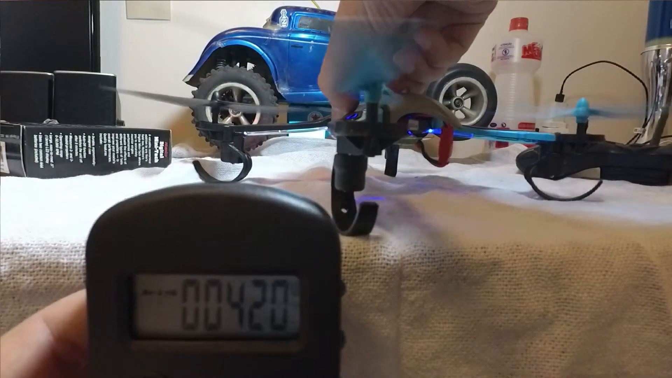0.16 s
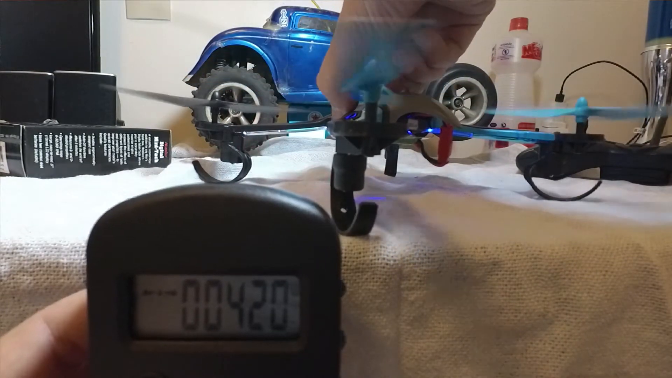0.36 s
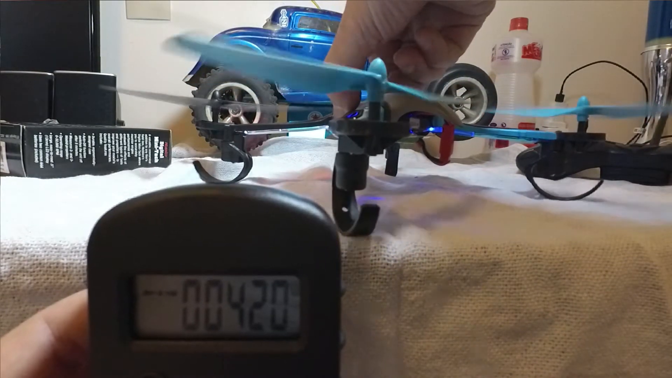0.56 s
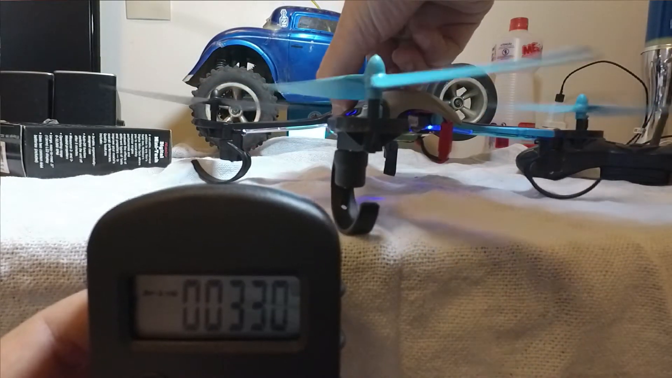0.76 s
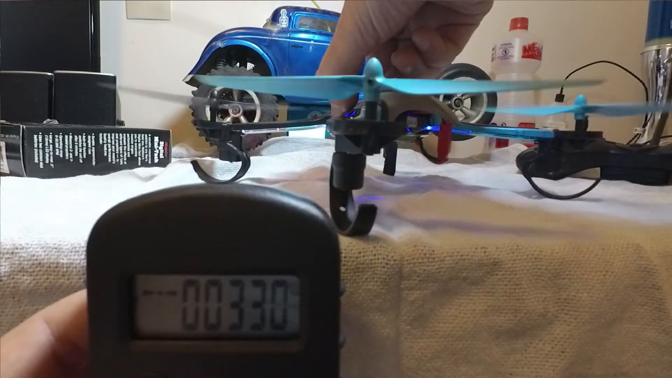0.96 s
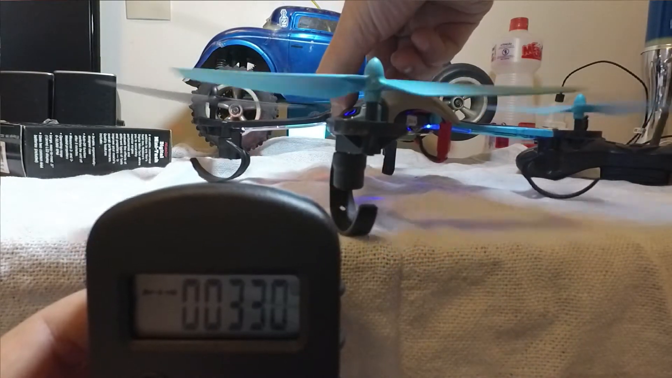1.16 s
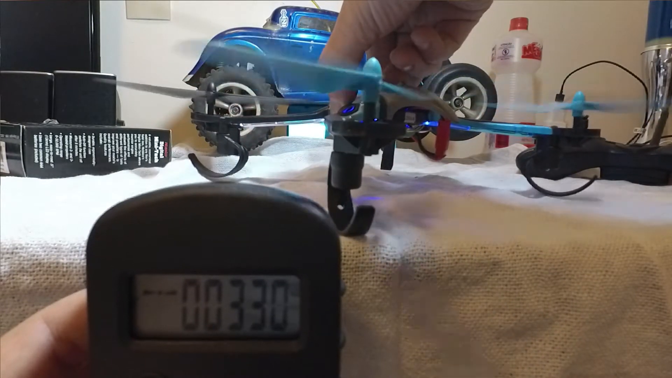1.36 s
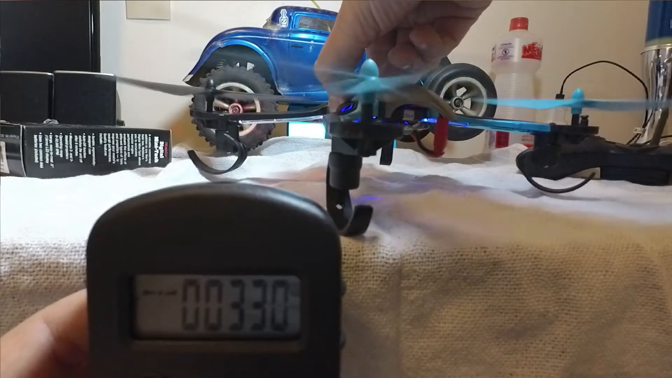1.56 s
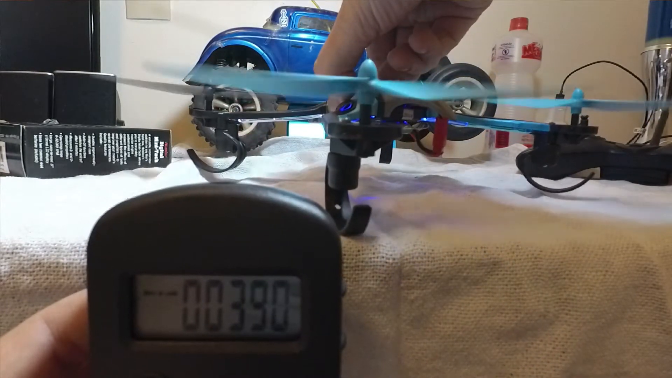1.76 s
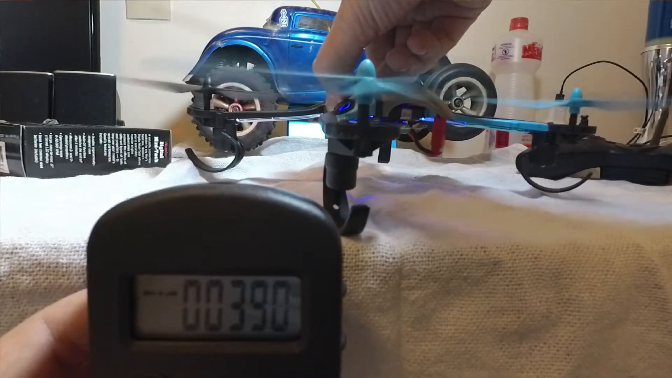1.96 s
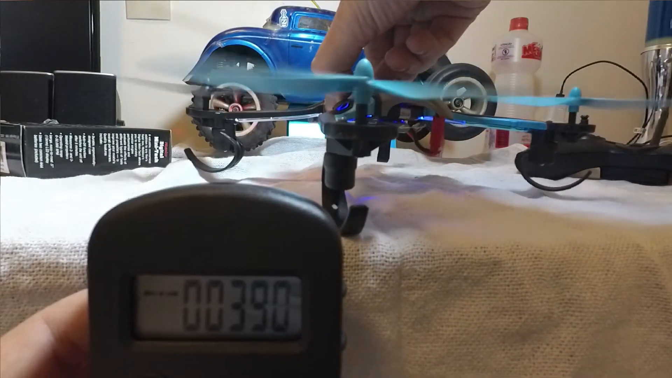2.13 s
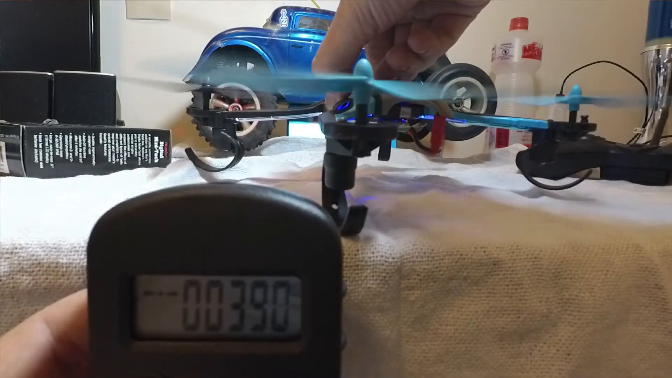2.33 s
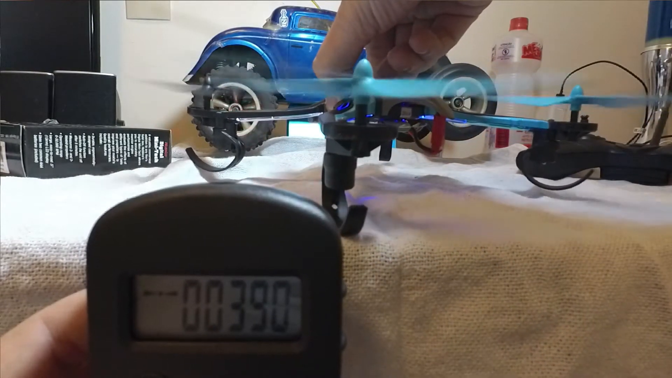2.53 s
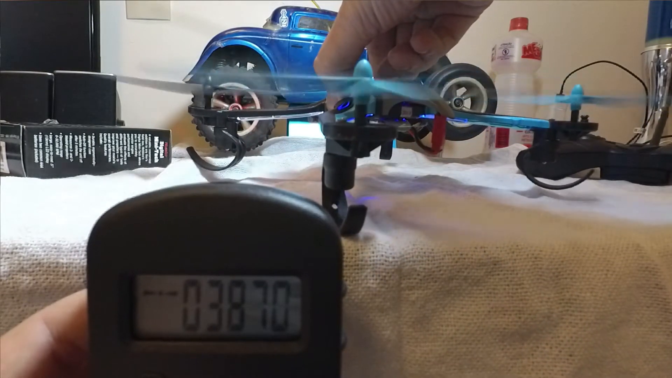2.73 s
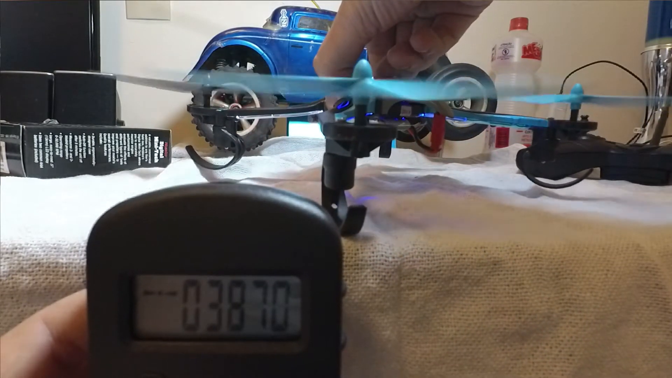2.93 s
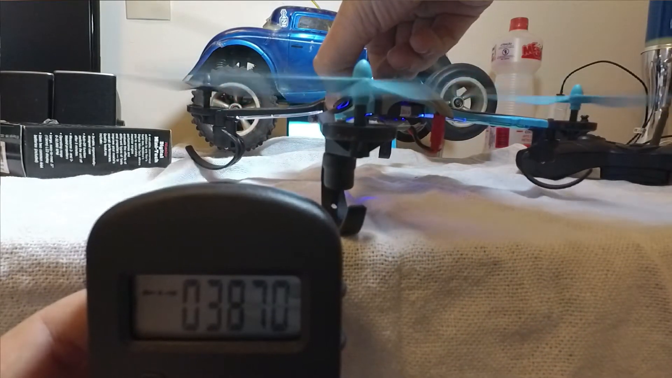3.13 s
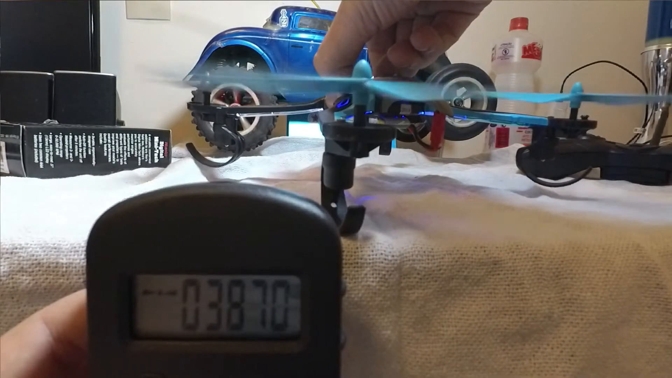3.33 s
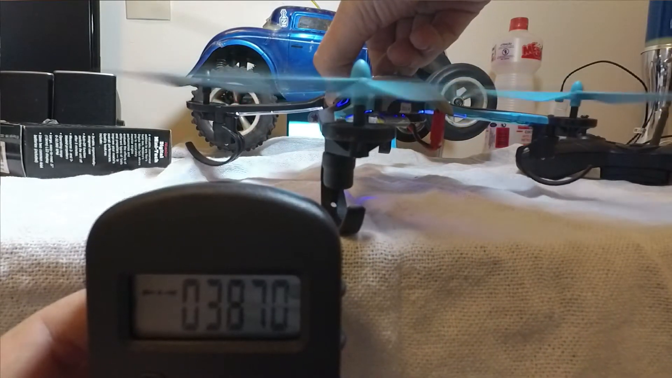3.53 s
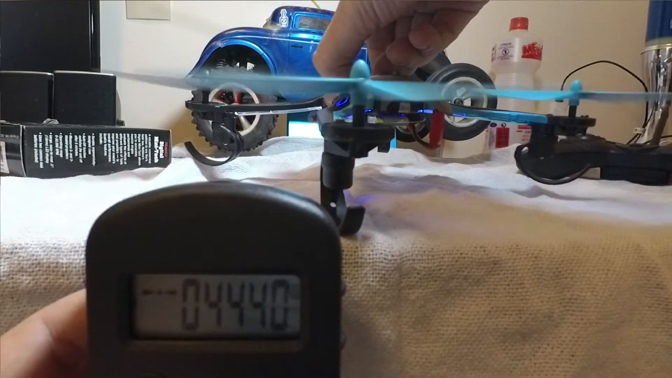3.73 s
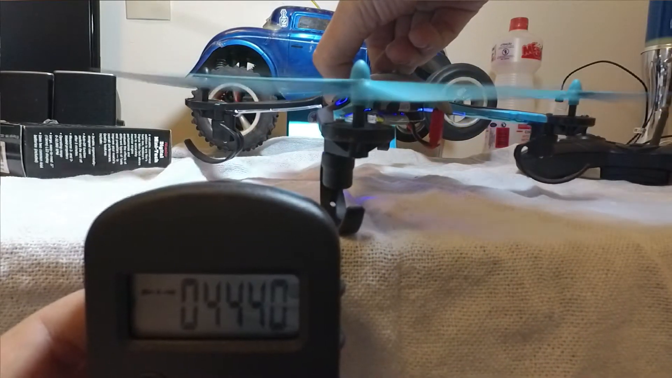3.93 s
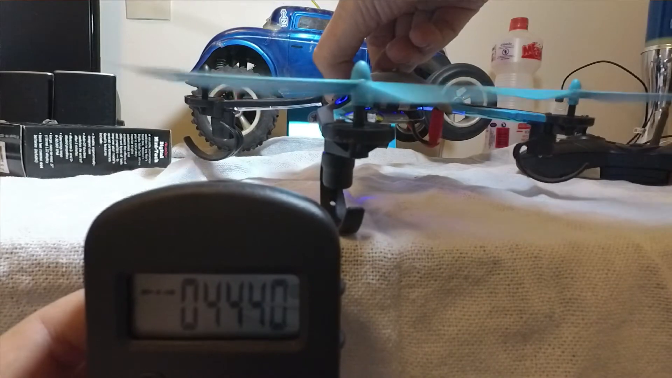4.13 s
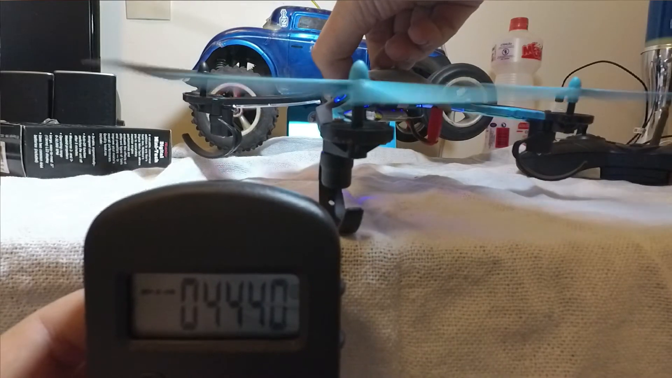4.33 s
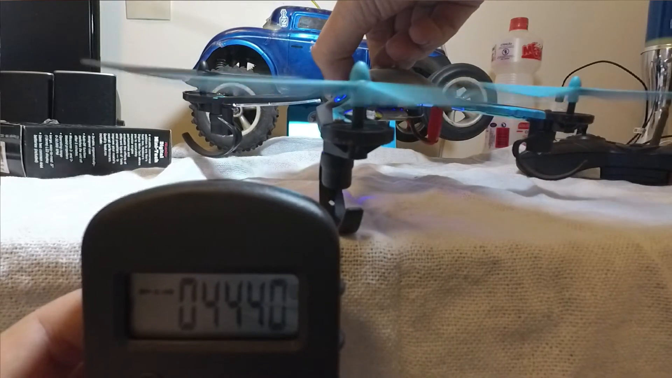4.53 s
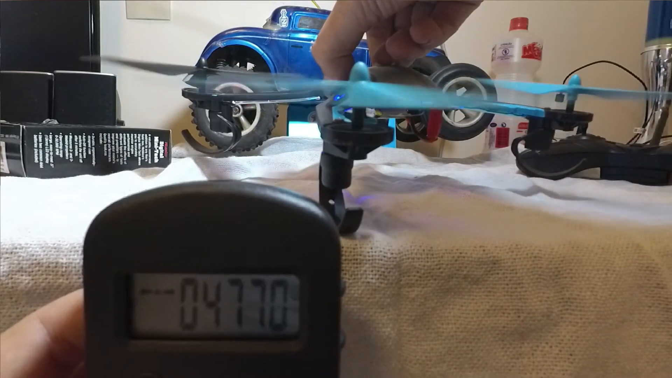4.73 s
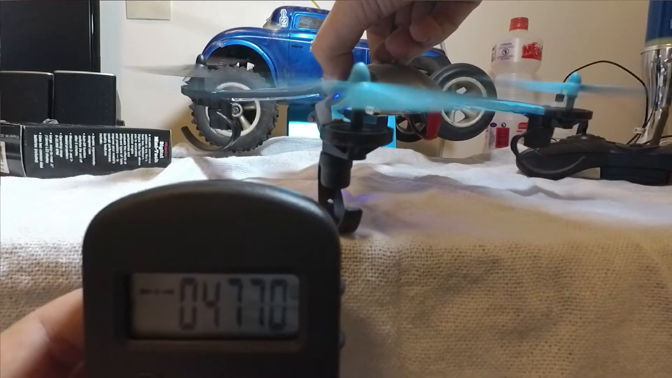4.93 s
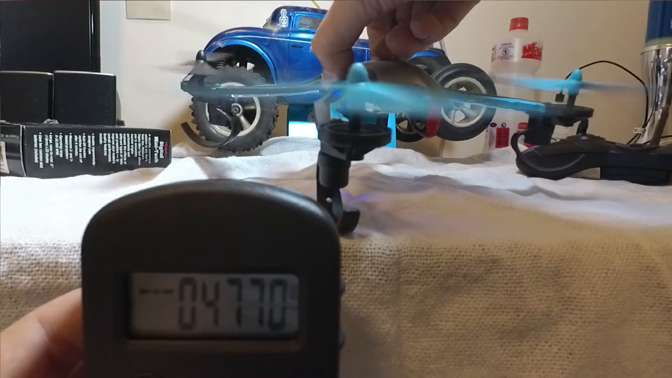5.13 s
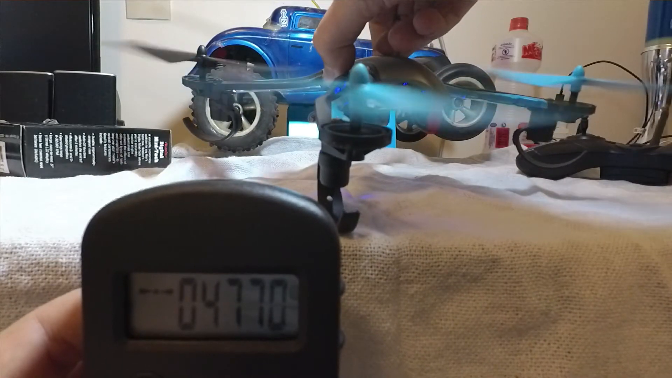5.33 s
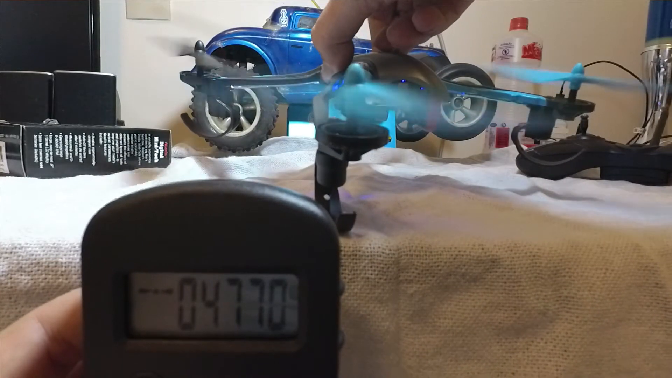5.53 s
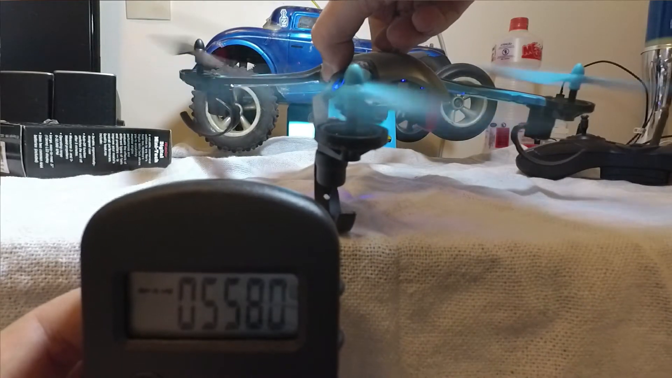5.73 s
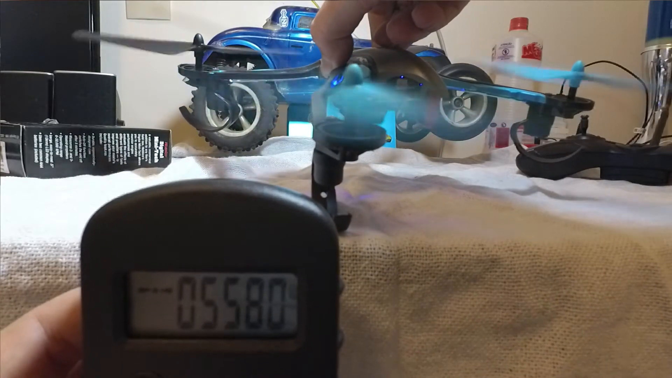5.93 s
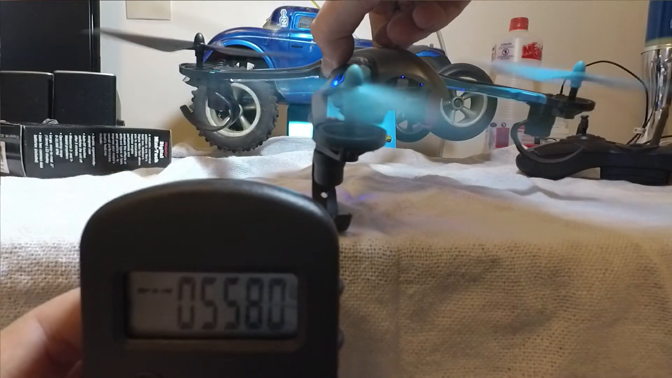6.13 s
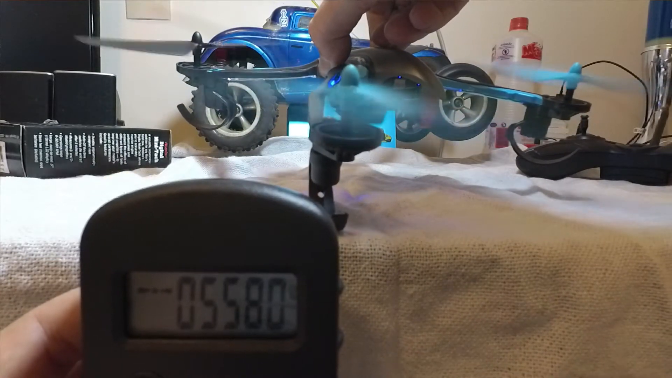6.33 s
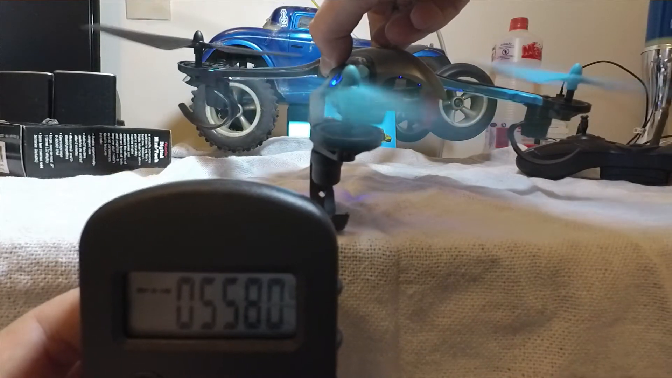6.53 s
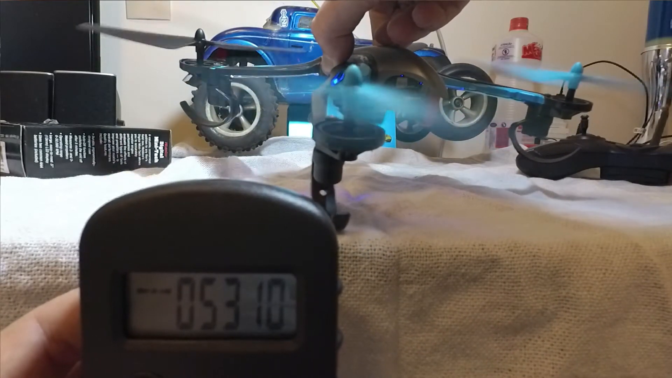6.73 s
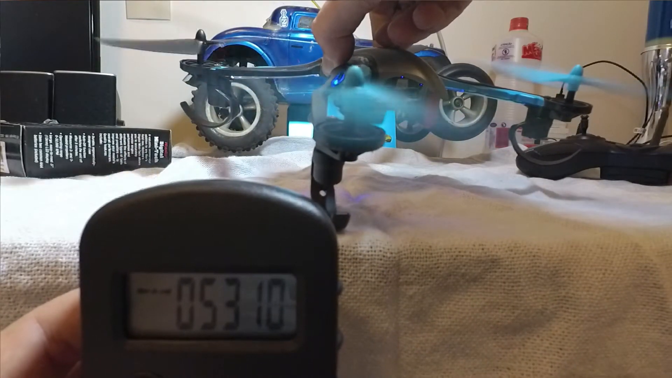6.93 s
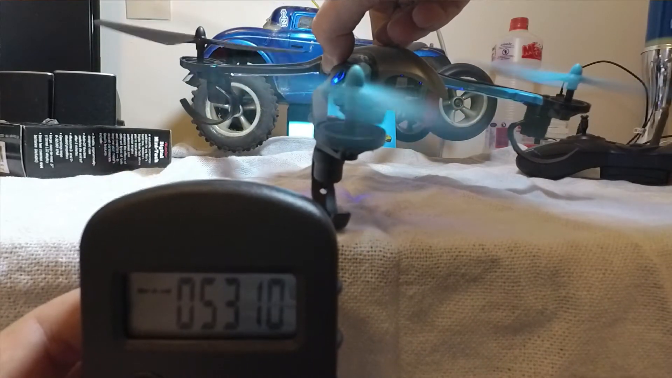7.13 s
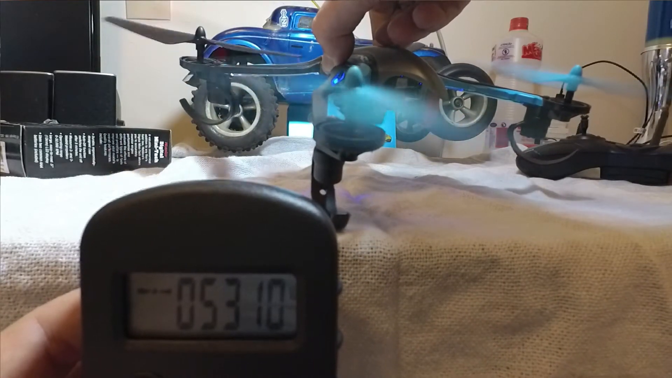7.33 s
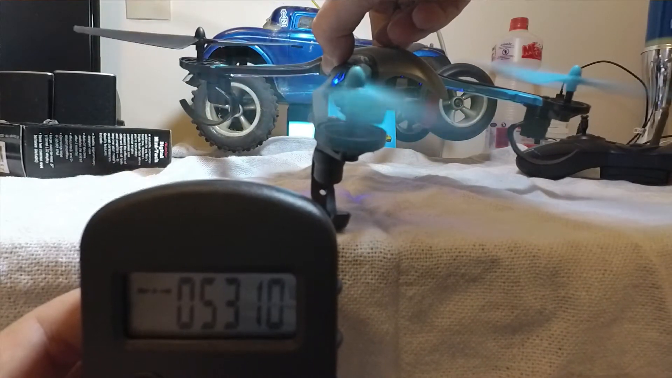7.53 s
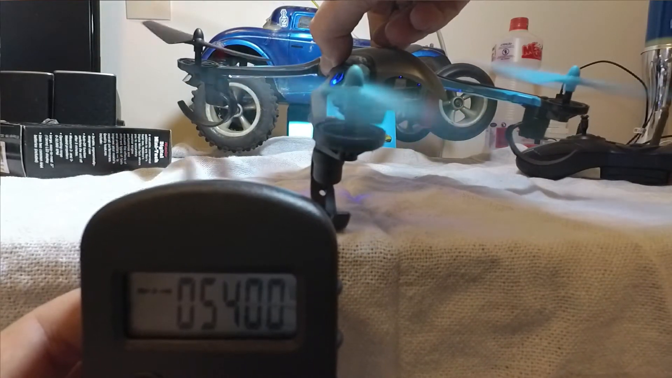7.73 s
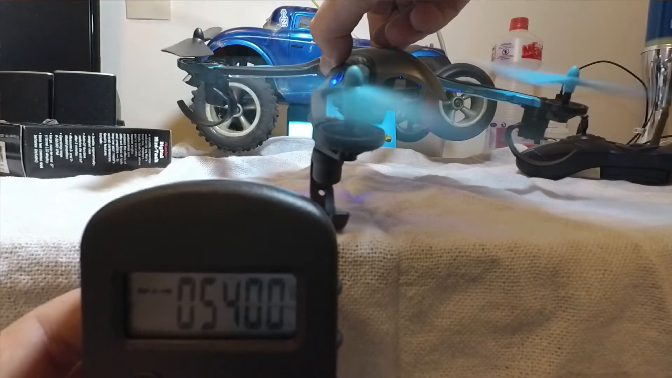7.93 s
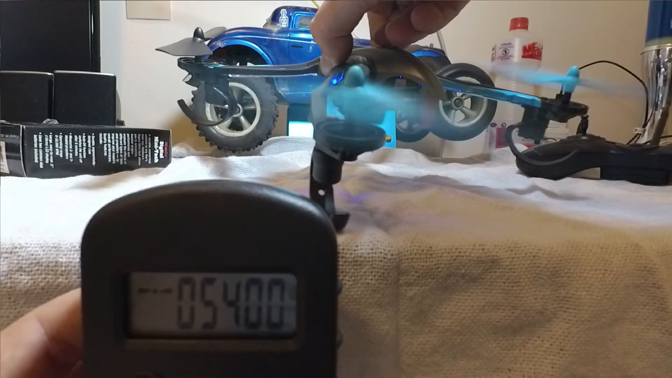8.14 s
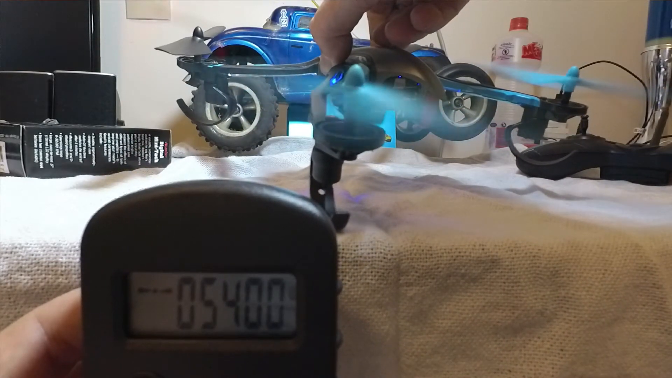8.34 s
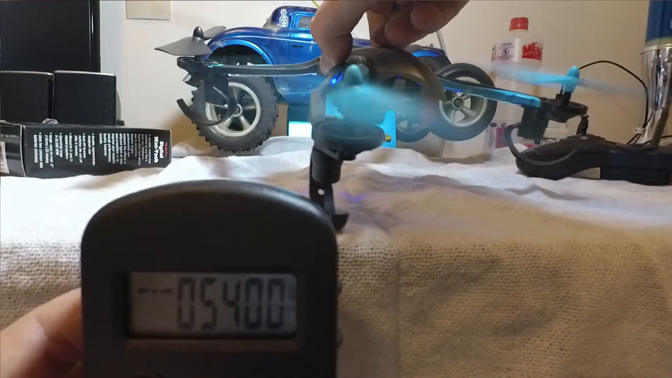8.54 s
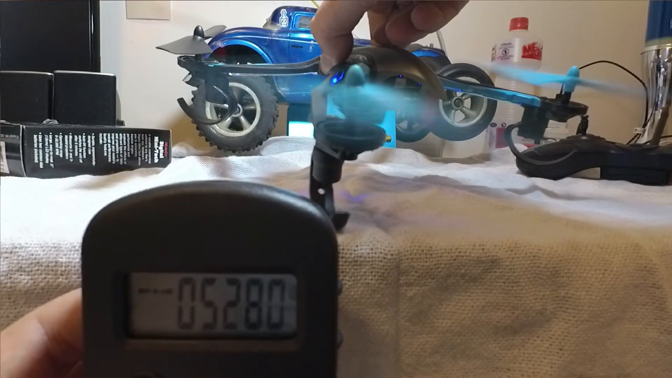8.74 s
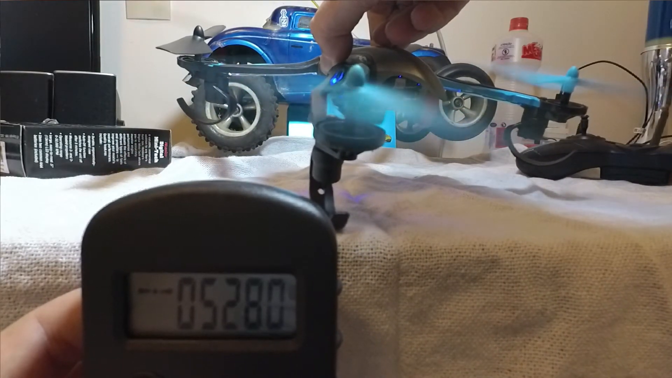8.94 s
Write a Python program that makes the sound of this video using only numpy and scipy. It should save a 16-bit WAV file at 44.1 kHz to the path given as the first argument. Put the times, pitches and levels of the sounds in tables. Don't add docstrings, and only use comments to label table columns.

```python
import sys
import numpy as np
from scipy import signal
from scipy.fft import rfft, irfft
from scipy.io import wavfile

SR = 44100
rng = np.random.default_rng(int(sys.argv[2]) if len(sys.argv) > 2 else 0)


def generate_wav(signal):
    frames = np.transpose(np.atleast_2d(signal))
    scaled = np.clip(frames, -1, 1) * 32767
    pcm = np.round(scaled).astype(np.int16)
    wavfile.write(sys.argv[1], SR, pcm)


def to_linear_factor(level_db):
    exponent = np.asarray(level_db, float) / 20
    return 10 ** exponent


N = 396018
FULL_PER_S = 132
GEAR_RATIO, PINION_TEETH = 7, 11

# (frequency [Hz], level [dB])
FRAME = [(300, -25.5), (950, -43), (1180, -25), (1660, -7.5), (1950, -18.5), (2550, -11.5), (3100, -16.5),
         (3620, 2), (4250, -21.5), (5400, -32.5), (6000, -14), (6900, -14), (7800, -22), (15300, -24.5)]


def rms_one(x):
    return x / np.sqrt(np.mean(x ** 2) + 1e-20)


def ramp(start_s, end_s):
    return np.clip((np.arange(N) / SR - start_s) / (end_s - start_s), 0, 1)


def in_time(rows):
    s, *columns = np.transpose(rows)
    return [np.interp(np.arange(N) / SR, s, c) for c in columns]


def against(rows, speed):
    at, *columns = np.transpose(rows)
    return [np.interp(np.log(speed), np.log(at), c) for c in columns]


def drift(rate):
    r = np.exp(-40 * np.pi * rate / SR)
    slow = signal.lfilter([1], [1, -2 * r, r * r], rng.standard_normal(N // 20 + 4002))[4000:]
    return np.interp(np.arange(N) / 20, np.arange(len(slow)), rms_one(slow))


def colour(x, *spectra):
    size = 8192
    log_hz = np.log(np.maximum(np.arange(size // 2 + 1) * SR / size, 1))
    level_db = 0
    for spectrum in spectra:
        hz, db = np.transpose(spectrum)
        level_db = level_db + np.interp(log_hz, np.log(hz), db)
    cepstrum = irfft(np.log(to_linear_factor(level_db)), size)
    cepstrum[1:size // 2] *= 2
    cepstrum[size // 2 + 1:] = 0
    response = irfft(np.exp(rfft(cepstrum)), size)
    return signal.oaconvolve(x, response)[:N]


def turning(passes_per_s):
    return np.pi * np.cumsum(passes_per_s) / SR


def tight_spot(turn, sharp):
    return rms_one(np.exp(sharp * (np.cos(turn) - 1)))


def mic_hiss():
    return to_linear_factor(-74) * rng.standard_normal(N)


def thuds():
    # (time [s], peak level [dB], pitch [Hz], time to fade by 60 dB [s])
    bumps = [
        (.01, -17, 74, 0.24),
        (0.101, -25, 45, .2),
        (1.551, -26.5, 59.4, 0.41),
        (1.678, -22, 51, 0.18),
        (1.949, -22.5, 71.5, 0.26),
        (2.09, -19, 80, .12),
        (2.97, -22, 60, 0.14),
    ]
    out, t = np.zeros(N), np.arange(SR // 2) / SR
    for s, db, hz, t60 in bumps:
        band = signal.butter(1, [0.16 * hz, 0.97 * hz], "band", fs=SR)
        burst = rms_one(signal.lfilter(*band, rng.standard_normal(len(t))))
        at = round(s * SR)
        out[at:at + len(t)] += burst * to_linear_factor(db - 4.5 - 60 * t / t60) * np.minimum(t / 0.011, 1)
    return signal.lfilter(*signal.butter(3, 300, fs=SR), out)


def air(passes):
    # (frequency [Hz], level [dB])
    rush_colour = [(20, -30), (60, 4), (150, -5), (250, -3), (350, -7.5), (700, -5.5), (1200, -6),
                   (2000, -9.5), (4000, -42), (9000, -89)]
    rush_db, = against([(64, -49), (FULL_PER_S, -38.5)], passes)
    rush = rms_one(colour(rng.standard_normal(N), rush_colour)) * to_linear_factor(rush_db + 0.62 * drift(9.2))
    buffet_db = -42.5 - 8.5 * ramp(5.3, 5.7) + 1.5 * drift(4)
    band = signal.butter(3, [18, 75], "band", fs=SR, output="sos")
    low = signal.sosfilt(band, rng.standard_normal(N))
    return rush + rms_one(low) * to_linear_factor(buffet_db)


def drive_whistle(turn, near_passes):
    # (blade passes [1/s], second partial [dB], third [dB], fourth [dB])
    whistle = [(15, -40, -49, -67), (50, -44, -48, -63), (94, -43.5, -53, -62.5), (103, -44.5, -62, -64),
               (133, -44, -65, -66)]
    # (second partial [dB], third [dB], fourth [dB])
    unpowered_db = [-1, -10, -7]
    # (start [s], end [s])
    pauses_fade = (1.4, 2.2)
    drive_hz, idle_ends_s = 3359.4, 0.97
    pause_every_s, pause_s, first_pause_s = .0942, .026, 1.04
    t = np.arange(N) / SR

    waiting = 1 - ramp(1.135, 1.155)
    second_db, third_db, fourth_db = [db + weak * waiting
                                      for db, weak in zip(against(whistle, near_passes), unpowered_db)]
    levels = [second_db - 3, second_db + 1.5, third_db + 1.5, fourth_db - 3]

    chopped = np.where(t < idle_ends_s, 1, 0.19 * ramp(*pauses_fade))
    off_part = .5 - .5 * np.tanh(3 * (np.cos(turn) + 0.2 * drift(40)))
    on = 1 - np.clip(chopped, 0, 1) * off_part

    from_pause = np.abs(((t - first_pause_s) / pause_every_s + .5) % 1 - .5) * pause_every_s
    paused = np.clip((pause_s / 2 - from_pause) / .004 + .5, 0, 1)
    paused = paused * (t > idle_ends_s) * (1 - ramp(*pauses_fade))

    phase = 2 * np.pi * drive_hz * t
    song = 0
    for k, db in enumerate(levels, 1):
        song = song + np.sqrt(2) * to_linear_factor(db + 1.5 * drift(30)) * np.cos(k * phase + 0.25 * drift(14))
    return on * (1 - .9 * paused) * song


def whine(turn, mesh_db, flaws_db, slack, bunched):
    # (multiple of a motor turn, level [dB])
    flaw_tones = [(2, -27), (3, 0), (4, -4), (5, -2.5), (6, -4), (7, -7), (8, -17), (9, -8), (10, -4.5),
                  (12, -5)]
    motor = GEAR_RATIO * turn + slack * drift(51)
    flaws = sum(to_linear_factor(db + 3.3 * drift(3.3)) * np.cos(k * motor + rng.uniform(0, 5.43))
                for k, db in flaw_tones)
    swell = 1 - bunched + bunched * tight_spot(turn + .3, sharp=2.4) * to_linear_factor(2.5 * drift(30))
    return to_linear_factor(flaws_db) * flaws + to_linear_factor(mesh_db) * swell * np.cos(PINION_TEETH * motor)


def rattle(turn, bunched, sharp, spiky_db):
    tight = tight_spot(turn, sharp) + .35 * tight_spot(turn + np.pi, sharp)
    gate = 1 - bunched + bunched * tight * to_linear_factor(1.8 * drift(21))
    return gate * to_linear_factor(spiky_db * drift(600) + 0.72 * drift(12.3)) * rng.standard_normal(N)


def far_rotors(near_passes):
    # (time [s], blade passes [1/s])
    far_speed = [(0, 67), (.6, 64), (1.1, 67), (1.7, 73), (2.5, 63), (3.3, 84), (4.5, 87.6), (4.9, 89),
                 (5.2, 94.5), (5.4, 101.5), (5.75, 104), (6.0, 109), (6.5, 112), (7.2, 118), (7.7, 115),
                 (8.98, 119)]
    # (time [s], level [dB])
    far_rattle = [(0, -25), (1.1, -24.5), (1.7, -22), (2.4, -25.5), (3.3, -25.5), (4.5, -30), (5.3, -31.5),
                  (7, -28.5), (8.98, -28)]
    # (blade passes [1/s], level [dB])
    far_whine = [(63, -50), (89, -46), (95.5, -38), (102, -40), (110, -47), (120, -50)]
    # (frequency [Hz], level [dB])
    far_tone = [(300, 3), (900, 5), (1120, 11.5), (1400, -4.5), (2050, 6), (2750, 0.5), (3300, 1.5),
                (6000, -2), (7400, -5), (8300, -1.5), (10200, -16.5), (11500, -15), (13200, -24),
                (15300, -37)]
    (passes,), (rattle_db,) = in_time(far_speed), in_time(far_rattle)
    whine_db, = against(far_whine, passes)
    turn = turning(passes) - 1.1
    teeth = to_linear_factor(rattle_db + 12) * rattle(turn, 0.36, sharp=1.47, spiky_db=2.1)
    lines = whine(turn, whine_db + 22, whine_db + 12.5, slack=0.098, bunched=0.45)
    tone_db = -38 + 6.5 * np.log2(passes / FULL_PER_S)
    thrust = to_linear_factor(tone_db + 1.8 * drift(12)) * (np.cos(2 * turn) + 0.13 * np.cos(turn))
    gears = colour(teeth + lines, FRAME, far_tone)
    return np.sqrt(2) * thrust + gears + drive_whistle(turn, near_passes)


def strain_hum():
    # (start [s], end [s], pitch [Hz], level [dB])
    start, end, hz, db = (1.22, 1.55, 235.5, -51)
    t = np.arange(N) / SR
    envelope = np.clip(np.minimum(t - start, end - t) / 0.046, 0, 1)
    return np.sqrt(2) * to_linear_factor(db) * envelope * np.cos(2 * np.pi * hz * t)


def near_speed():
    # (time [s], blade passes asked for [1/s])
    notches = [(0, 15), (1.45, 46), (1.72, 54), (1.94, 62), (2.14, 67.5), (2.54, 70.4), (2.78, 77.8),
               (3.18, 82.4), (3.28, 87.4), (3.5, 90.1), (3.7, 95.4), (4.0, 100.8), (4.14, 107.4),
               (4.54, 114.5), (4.76, 116.8), (4.88, 120.6), (5.18, 125), (5.26, 128.7), (5.68, 132.7),
               (5.88, 131.8), (6.92, 133.6), (7.6, 132.9), (8.66, 133.6)]
    inertia_s = .06
    s, asked = np.transpose(notches)
    coarse = np.arange(0, N, 20)
    since = np.maximum(coarse[:, None] / SR - s[1:], 0) / inertia_s
    speed = asked[0] + (1 - (1 + since) * np.exp(-since)) @ np.diff(asked)
    return np.interp(np.arange(N), coarse, speed) + .5 * drift(3.856)


def blades(turn, passes, level_db, wobble_db, soft_db):
    # (multiple of a rotor turn, level [dB])
    blade_tone = [(1, -44), (2, 1), (3, -25.5), (4, -7), (5, -34.5), (6, -19), (7, -33.5), (8, -32.5),
                  (9, -26.5), (10, -27.5), (12, -36.5), (14, -52), (16, -43)]
    octaves = np.log2(np.clip(passes / FULL_PER_S, .1, 1))
    tone = 0
    for k, db in blade_tone:
        softening_db = soft_db * octaves * max(k - 6, 0) * (1 if k % 2 else .3)
        flutter_db = (k > 6) * 3.1 * drift(15)
        tone = tone + to_linear_factor(db + softening_db + flutter_db) * np.cos(k * turn)
    return np.sqrt(2) * to_linear_factor(level_db + wobble_db * drift(2.1)) * tone


def knock(turn, slack):
    # (multiple of the tooth mesh rate, level [dB])
    overtones = [(2, -4), (3, -3), (4, -3)]
    mesh = PINION_TEETH * (GEAR_RATIO * turn + slack * drift(640))
    return sum(to_linear_factor(db + 1.6 * drift(20)) * np.cos(k * mesh) for k, db in overtones)


def near_rotor(passes):
    # (blade passes [1/s], rattle [dB], tooth mesh [dB], gear flaws [dB])
    gears = [(15, -57, -60, -60), (45, -44, -37, -54), (56, -45, -35, -46), (65, -41, -33, -41),
             (73, -41, -41, -41), (82, -41, -35, -43), (94, -36, -36, -43), (105, -37.5, -45, -44),
             (122, -36.5, -43, -44), (133, -35.5, -49, -47)]
    # (blade passes [1/s], share bunched once a turn [0-1])
    bunching = [(15, 0.6), (55, 0.7), (67, 0.44), (80, 0.57), (95, .7), (103, 0), (133, 0.02)]
    # (blade passes [1/s], level [dB], share bunched [0-1])
    striking = [(15, -56, .5), (45, -45, .9), (66, -42, .95), (76, -34, .95), (88, -38, .95),
                (98, -33, .95), (104, -36, .9), (118, -30, .85), (132, -33, .4)]
    # (time [s], level over the idle rattle [dB])
    lurches = [
        (1.2, 8),
        (1.29, 12),
        (1.42, 9),
        (1.57, 5),
    ]
    # (frequency [Hz], level [dB])
    near_tone = [(300, -3), (2000, -4.5), (4000, 2.5), (8500, 5), (10800, 0.5), (12200, 3), (13200, -7),
                 (15300, -3)]
    t = np.arange(N) / SR
    turn = turning(passes)

    tone_db = -17.5 + 17 * np.log2(passes / FULL_PER_S)
    tone_db = tone_db - 0.94 * ramp(7.03, 7.13)
    tone_db = tone_db + 10 * np.minimum(np.log2(passes / 62), 0)
    thrust = blades(turn, passes, tone_db, wobble_db=0.8, soft_db=10.5)

    rattle_db, mesh_db, flaws_db = against(gears, passes)
    rattle_db = rattle_db + sum(db * np.exp(-((t - s) / .022) ** 2) for s, db in lurches)
    bunched = np.clip(against(bunching, passes)[0], 0, 1)
    teeth = to_linear_factor(rattle_db + 23.5) * rattle(turn + .6, .7 * bunched, sharp=5, spiky_db=2.2)
    slack = 0.09 * (passes / FULL_PER_S) ** 2
    lines = whine(turn, mesh_db + 20, flaws_db + 20, slack=slack, bunched=bunched)

    knock_db, struck = against(striking, passes)
    bursts = 1 - struck + struck * tight_spot(turn + .6, sharp=9)
    knocks = to_linear_factor(knock_db + 17) * bursts * knock(turn, slack=0.055)
    knocks = signal.sosfilt(signal.butter(6, 12700, fs=SR, output="sos"), knocks)
    return thrust + colour(teeth + lines + knocks, FRAME, near_tone)


def scene():
    passes = near_speed()
    background = mic_hiss() + thuds() + air(passes)
    return (background + far_rotors(passes) + strain_hum() + near_rotor(passes))[None]


def band_limit(x):
    return signal.sosfilt(signal.butter(12, 15290, fs=SR, output="sos"), x)


def record(dry):
    cut = signal.sosfilt(signal.cheby2(12, 60, 15480, fs=SR, output="sos"), dry)
    return band_limit(cut)


dry = scene()
out = record(dry)
generate_wav(out)
```